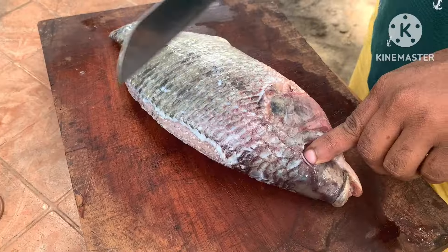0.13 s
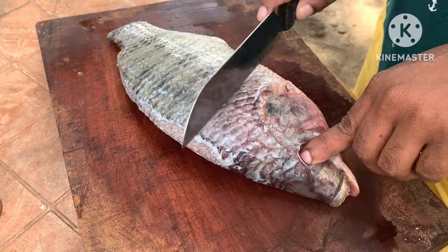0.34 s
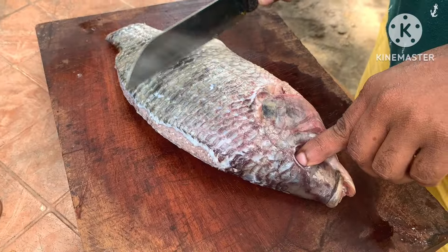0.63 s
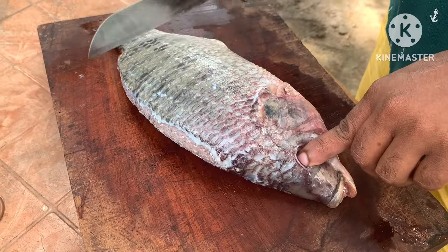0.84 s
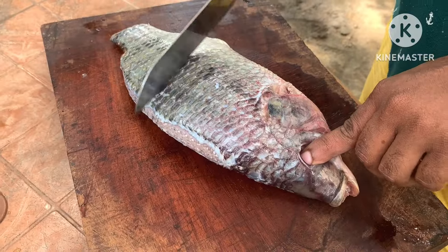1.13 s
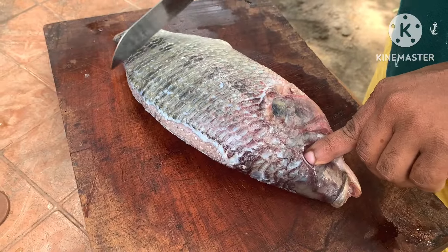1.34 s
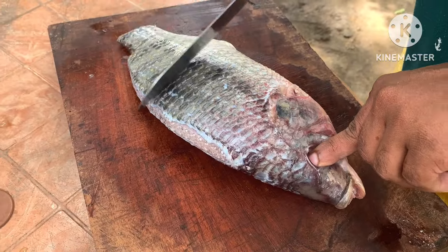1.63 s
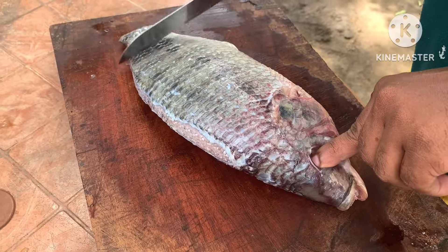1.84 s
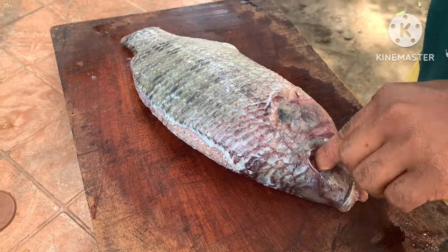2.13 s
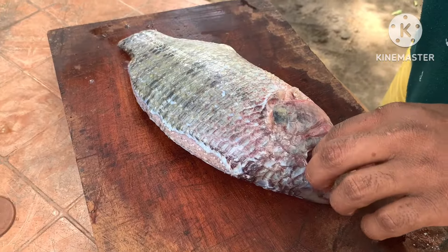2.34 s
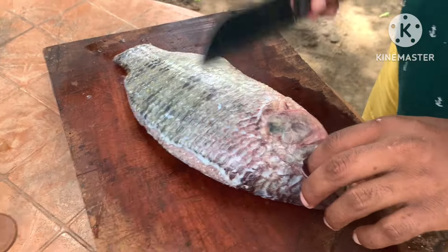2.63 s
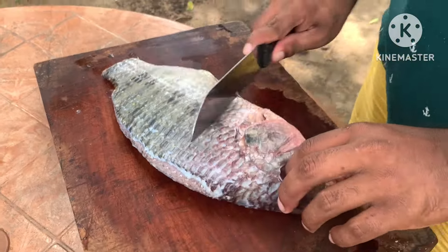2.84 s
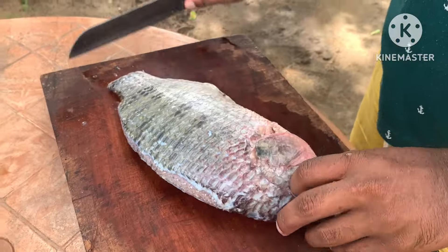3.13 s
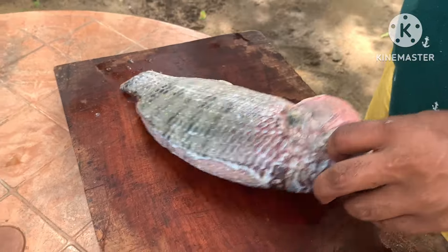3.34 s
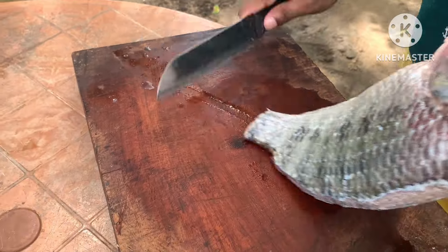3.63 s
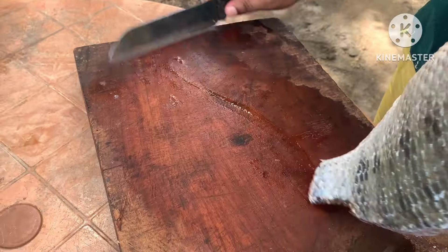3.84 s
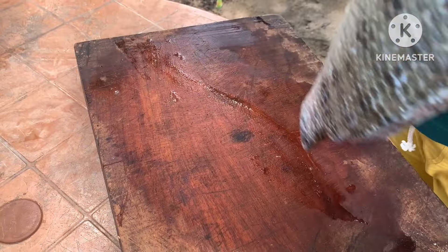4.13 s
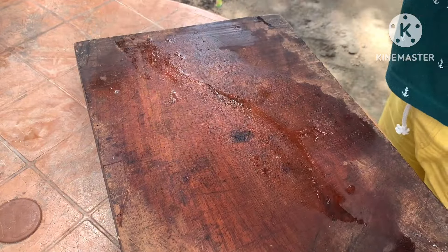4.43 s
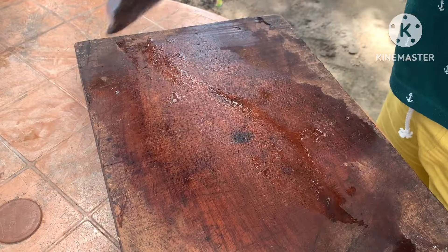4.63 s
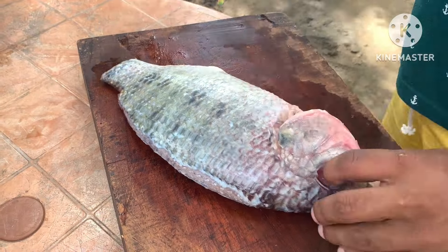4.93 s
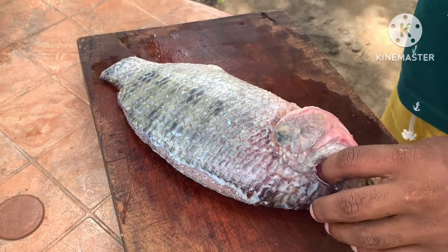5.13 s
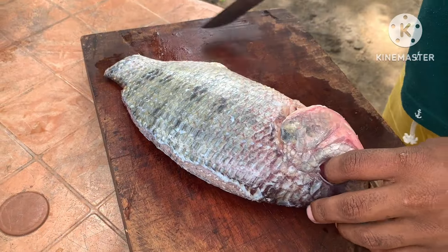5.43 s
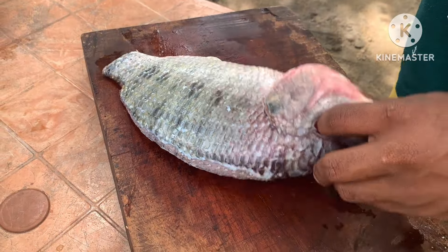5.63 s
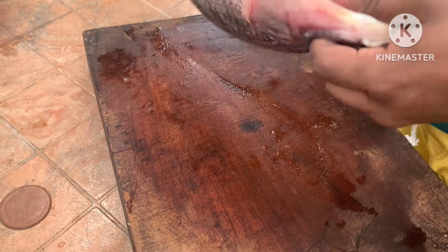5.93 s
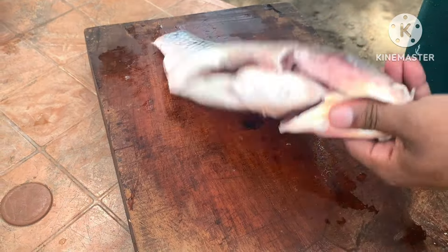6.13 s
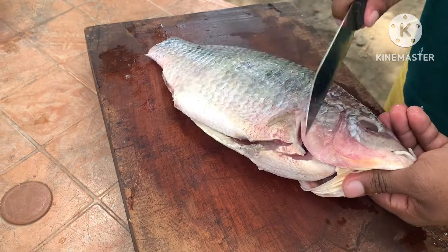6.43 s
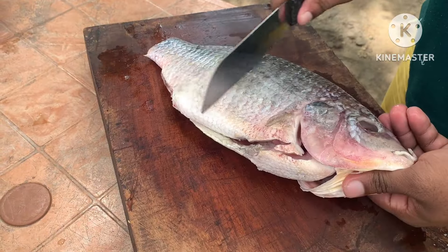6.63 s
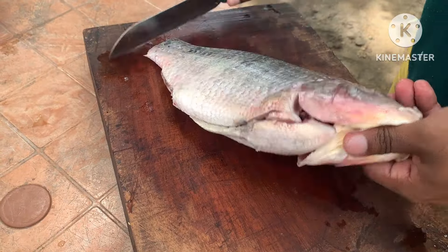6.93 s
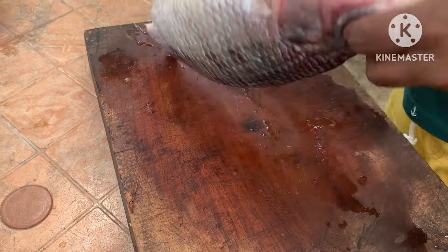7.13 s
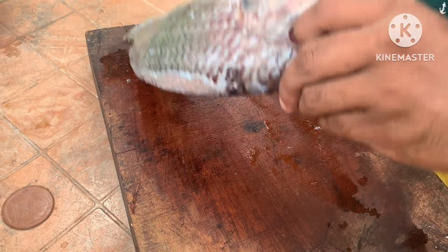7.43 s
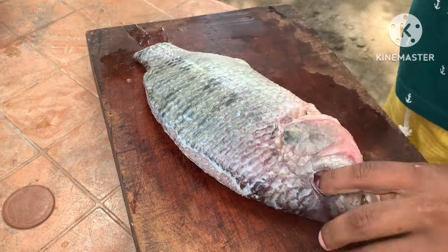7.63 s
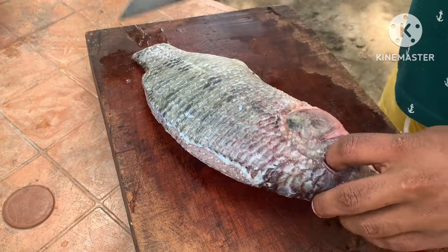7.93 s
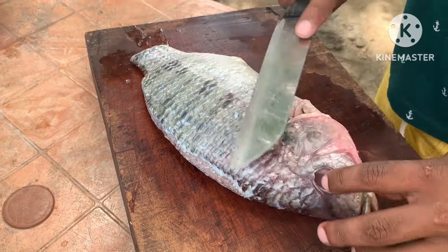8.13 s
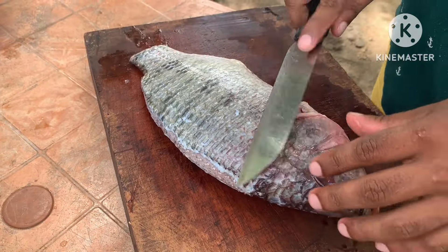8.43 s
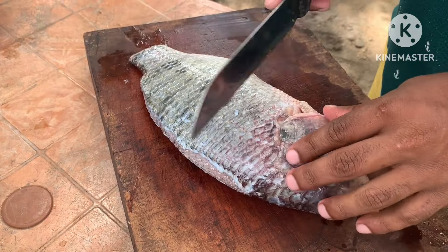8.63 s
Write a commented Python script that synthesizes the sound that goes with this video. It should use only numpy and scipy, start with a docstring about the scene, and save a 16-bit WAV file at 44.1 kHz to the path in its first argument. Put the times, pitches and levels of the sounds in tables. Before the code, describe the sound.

A knife works on a wet fish on a wooden cutting board, close and centred, outdoors over a faint low rumble and distant insect hiss. From the start, soft grainy scrapes slide across the scales. From 0.8 seconds a cricket-like insect on the right sings short, high, rising trills roughly once a second. At 2 seconds a quick cluster of knocks rattles the board and thumps the light table beneath. The hardest knock lands at 3.1 seconds with a brief rasp. More knocks and a bright blade scrape follow around 3.7 to 3.9. Scales and wet skin tick as the fish is lifted and turned. Another hard, sharp knock comes at 5.3 seconds, then scattered wet clicks and light scrapes. Further knocks fall at 6.5, at 6.9 with a dull thump, and more softly at 7.5 and 7.9, leaving faint ticks until nearly 9 seconds.

```python
"""Outdoors, over a low rumble, a far insect hiss and a faint hum, a knife slides over a wet fish and a
wooden board: grains under the edge hiss and rasp. From 0.8 s a cricket-like insect nearby sings rising
trills, one pulse per wing stroke. From 1.2 s scales and slime tick as the fish is lifted and turned.
Then blade and fish knock the board, and from 1.9 s the light table under it thumps. The sounds
interleave to the end; the hardest knocks come near 3.1 s and 5.3 s."""
import sys
import numpy as np
from scipy import signal
from scipy.fft import rfft, irfft, next_fast_len
from scipy.io import wavfile
from scipy.ndimage import uniform_filter1d

SR = 44100
rng = np.random.default_rng(int(sys.argv[2]) if len(sys.argv) > 2 else 0)


def store_wav(level_fs):
    """Save 16-bit WAV to argv[1]."""
    pcm = np.round(np.clip(np.atleast_2d(level_fs), -1, 1) * 32767)
    wavfile.write(sys.argv[1], SR, pcm.T.astype(np.int16))


N = 386757
N_FFT = next_fast_len(N)
BIN_HZ = np.fft.rfftfreq(N_FFT, 1 / SR)

# modes of the wooden board: f/Hz, level/dB, t60/s
BOARD_MODES = [(452.2, -4.5, 0.035), (647, -9, 0.075), (770, -2.5, 0.018), (888.5, -4, 0.014),
               (1140, -9.5, 0.056), (1254, -1.5, 0.043), (1361, 4, 0.03), (1656, 3.5, 0.022),
               (2054, -5, 0.043), (2266, 7.5, 0.025), (2986, 6.5, 0.014), (3217, 1.5, 0.014),
               (3940, -1.5, 0.0074), (4620, -7.5, 0.0061), (4990, -10.5, .02)]
# pushes on the table top: t/s, peak/dB, best excited f/Hz
TABLE_PUSHES = [(1.948, -18, 193), (2, -18, 206), (2.022, -23, 111.4), (2.709, -35.5, 86.1),
                (3.072, -20.5, 174), (3.101, -28.5, 76.8), (3.669, -32, 184), (4.702, -36.5, 112),
                (4.739, -37, 78.1), (5.339, -26, 277), (5.506, -35, 126), (6.112, -38.5, 116),
                (6.144, -32, 65.5), (6.938, -19, 116), (6.955, -21, 90), (7.471, -37, 80),
                (7.508, -30.5, 56), (7.548, -33.5, 96.9), (8.437, -43.5, 90.7)]


def from_db(db):
    return 10 ** (np.asarray(db) / 20)


def unit_rms(x):
    return x / np.sqrt(np.mean(x ** 2) + 1e-20)


def butter(order, hz, kind):
    return signal.butter(order, hz, kind, fs=SR, output="sos")


def add(out, at_s, piece):
    i = round(at_s * SR)
    out[i:i + len(piece)] += piece[:N - i]


def per_bin(curve):
    """Curve read at each FFT bin, on a log-frequency axis."""
    hz, value = np.transpose(curve)
    return np.interp(np.log(BIN_HZ + 1), np.log(hz + 1), value)


def drift(rate_hz):
    """Smooth random wander, rms about 1."""
    step_hz = 200
    steps = rng.standard_normal(int(N / SR * step_hz) + 2)
    r = np.exp(-2 * np.pi * rate_hz / step_hz)
    smooth = unit_rms(signal.lfilter([1], [1, -2 * r, r * r], steps))
    return np.interp(np.arange(N) / SR * step_hz, np.arange(len(steps)), smooth)


def ring(x, hz, t60_s):
    """One damped mode; a unit click rings at height 1."""
    r, w = from_db(-60 / (t60_s * SR)), 2 * np.pi * hz / SR
    return signal.lfilter([.5, 0, -.5], [1, -2 * r * np.cos(w), r * r], x) / np.sin(w)


def falloff_db(hz, best_hz, db_per_octave):
    """Modes far from the best excited pitch get less."""
    return -db_per_octave * np.abs(np.log2(hz / best_hz))


def strike(modes, weights_db, contact_s):
    """Weighted modes swell during contact, then decay; peak 1."""
    t = np.arange(SR // 3) / SR
    hz, db, t60_s = np.transpose(modes)[:, :, None]
    strength, phase = rng.standard_normal((2, len(modes), 1))
    decay = from_db(db + weights_db[:, None] + 1.5 * strength - 60 * t / t60_s)
    rings = decay * np.sin(2 * np.pi * hz * t + 2 * phase)
    out = rings.sum(0) * (1 - np.exp(-(t / contact_s) ** 2))
    return out / np.abs(out).max()


def stereo_noise(spectrum):
    """Shaped noise, its sides alike only in the bass; mid rms 1."""
    # left-right likeness: f/Hz, correlation
    likeness = [(60, .96), (300, .88), (640, .2), (3000, 0), (6800, -.2), (15000, -.3)]
    alike = per_bin(likeness)
    mid, side = rfft(rng.standard_normal((2, N_FFT))) * from_db(per_bin(spectrum))
    pair = irfft(np.sqrt(1 + alike) * mid + np.sqrt(1 - alike) * side * [[1], [-1]], N_FFT)[:, :N]
    return pair / np.sqrt(np.mean(pair.mean(0) ** 2))


def rumble():
    """Lumpy low noise; its upper part swells as the table rattles on after each thump."""
    # rumble envelope: t/s, level/dB
    envelope = [(0.0, -60.5), (0.36, -64), (0.56, -57), (0.95, -63.5), (1.17, -57), (1.59, -57),
                (2.42, -61.5), (2.95, -53), (3.5, -60), (3.88, -52), (4.47, -67.5), (5.18, -55.5),
                (5.91, -60), (6.5, -55.5), (7.21, -60.5), (7.7, -56.5), (8.16, -59), (8.33, -48.5),
                (8.5, -58), (8.77, -61.5)]
    # rumble spectrum: f/Hz, density/dB
    spectrum = [(13, -44.5), (22, -21), (59, 4), (91, 0), (169, -7.5), (262, -16), (316, -13.5),
                (392, -24.5), (700, -24), (910, -67), (1540, -120)]
    rattle_db, rattle_t60_s = -13, .18
    t, rattle = np.arange(N) / SR, np.zeros(N)
    for at_s, db, _ in TABLE_PUSHES:
        add(rattle, at_s, from_db(db + rattle_db - 60 * t[:SR] / rattle_t60_s))
    noise = from_db(4.2 * drift(36)) * stereo_noise(spectrum)
    upper = signal.sosfilt(butter(4, 70, "high"), noise)
    return from_db(np.interp(t, *np.transpose(envelope))) * noise + rattle * upper


def far_hiss():
    """Leaves and distant noise waver more than the far insects above them in pitch."""
    # faint background hiss, with a narrow gap near 11.5 kHz not from the scene: f/Hz, density/dB
    spectrum = [(240, -46.5), (400, -14), (755, -10.5), (1220, -6.5), (1420, -12.5), (1740, -9),
                (5560, -9.5), (7350, 2), (10500, -16.5), (11000, -17), (11500, -68), (12500, -11.5),
                (14100, -25.5), (15000, -13), (16200, -55)]
    noise = stereo_noise(spectrum)
    leaves = signal.sosfiltfilt(butter(2, 5500, "low"), noise)
    insects = noise - leaves
    return leaves * from_db(-63.5 + 2 * drift(1.1)) + insects * from_db(-65.5 + drift(1.9))


def hum():
    """Faint low tone that comes and goes."""
    return from_db(-79 + 4 * drift(5)) * unit_rms(ring(rng.standard_normal(N), hz=312, t60_s=.2))


def blade_hiss(grains):
    """Grains hiss under the edge and ring the blade."""
    # bright scraping hiss, with a gap near 11-12 kHz not from the knife: f/Hz, density/dB
    spectrum = [(900, -30), (1500, -12), (2500, -3.5), (4000, -7), (5600, -8), (7000, -1.5), (9000, -7),
                (10700, -3), (11300, -38), (12100, -35), (12600, -8.5), (14500, -8), (15700, -12.5),
                (16300, -49)]
    # blade modes: f/Hz, nominal width/Hz, level/dB
    modes = [(5260, 75, -16), (6700, 100, 0.5), (8780, 250, -4), (10060, 70, -1)]
    # how freely the blade rings: t/s, gain/dB
    freedom = [(0, -28), (2.9, -11.5), (3.8, -6.5), (4.2, -10), (6.4, -9.5), (6.5, -15.5), (6.9, 5),
               (7.05, -15.5), (8.77, -5)]
    hiss = unit_rms(irfft(rfft(grains, N_FFT) * from_db(per_bin(spectrum)), N_FFT)[:N])
    ringing = sum(from_db(db + 2 * drift(1.1)) * unit_rms(ring(grains, hz, 2.6 / width_hz))
                  for hz, width_hz, db in modes)
    return hiss + from_db(np.interp(np.arange(N) / SR, *np.transpose(freedom))) * ringing


def board_rasp(grains, grid_s, best_hz, gain):
    """Grains ring the rubbed board; the place of the edge favours modes near a pitch and 2.1 times it."""
    t, rasp = np.arange(N) / SR, np.zeros(N)
    t60_share = .9
    press_db = np.clip(20 * np.log10(gain) + 16, -30, 0)
    for hz, db, t60_s in BOARD_MODES:
        place_db = np.maximum(falloff_db(hz, best_hz, 30), falloff_db(hz, 2.1 * best_hz, 60) - 1.5)
        # a firm press also reaches the hollow low and hard high modes
        floor_db = press_db if 550 < hz < 900 or 2700 < hz < 3300 else -40
        weight = from_db(db + np.maximum(place_db, floor_db))
        rasp += np.interp(t, grid_s, weight) * ring(grains, hz, t60_share * t60_s)
    running_rms = np.sqrt(uniform_filter1d(rasp ** 2, SR // 8))
    return np.interp(t, grid_s, gain) * rasp / running_rms


def knife_strokes():
    """The sliding edge meets dense, uneven grains that drive blade and board."""
    # slides: firmest t/s, 20 dB rise/s, 20 dB fall/s, hiss/dB, rasp/dB, best excited f/Hz
    slides = [(0.02, 0.06, 0.053, -61, -68, 1390), (0.18, 0.048, 0.072, -63, -66.5, 1800),
              (0.5, 0.11, 0.26, -70, -66.5, 507), (0.67, 0.35, 0.22, -51.5, -61.5, 500),
              (1.1, 0.09, 0.58, -60.5, -63.5, 504), (1.63, 0.15, 0.3, -65, -82, 543),
              (1.809, 0.034, 0.12, -66, -52.5, 835), (1.932, 0.025, 0.033, -55.5, -58, 846),
              (1.998, 0.043, 0.11, -50.5, -53, 1330), (2.62, 0.061, 0.12, -60, -80, 760),
              (2.705, 0.015, 0.02, -51, -51, 870), (2.765, 0.02, 0.089, -49.5, -51.5, 810),
              (2.952, .09, 0.22, -48.5, -48, 500), (3.098, 0.028, 0.029, -29.5, -30, 1350),
              (3.145, .02, 0.047, -62, -59.5, 655), (3.314, .08, 0.11, -55, -70, 1660),
              (3.67, 0.12, 0.18, -54, -67, 1400), (3.775, 0.039, 0.081, -34.5, -29, 1280),
              (3.838, 0.046, 0.03, -18.5, -22, 1190), (3.921, .04, 0.19, -57, -71.5, 1325),
              (4.715, 0.0083, 0.018, -60, -48.5, 1050), (4.854, 0.17, 0.13, -55, -62.5, 1040),
              (5.361, .01, 0.015, -59, -33, 760), (5.391, .02, 0.073, -50.5, -56, 780),
              (5.52, 0.04, 0.038, -79.5, -63.5, 527), (5.686, 0.14, 0.23, -51, -75, 2390),
              (6.127, 0.034, 0.18, -52, -61.5, 1280), (6.36, 0.19, 0.14, -63.5, -78, 1400),
              (6.479, 0.016, 0.11, -49, -48.5, 680), (6.65, 0.17, .2, -53, -61.5, 730),
              (6.83, 0.0057, 0.0065, -33.5, -55, 1330), (6.88, 0.037, .06, -63, -63.5, 1400),
              (6.933, 0.015, 0.042, -45, -31, 1140), (7.014, .01, 0.084, -50, -79, 1110),
              (7.493, 0.066, .1, -56, -77, 1427), (7.531, 0.013, 0.077, -53, -47.5, 1480),
              (7.936, 0.11, 0.065, -60, -77, 1440), (8.03, 0.14, 0.21, -59, -80.5, 1500),
              (8.3, 0.075, 0.08, -75, -67, 497)]
    grains_per_s, size_spread_db = 6000, 3
    t, grid_s = np.arange(N) / SR, np.arange(0, N / SR, .001)
    at_s, rise_s, fall_s, hiss_db, rasp_db, hz = np.transpose(slides)[:, :, None]
    distance = np.abs(grid_s - at_s) / np.where(grid_s < at_s, rise_s, fall_s)
    fade_db = 20 * np.minimum(distance, 5) ** 1.34
    hiss_gain, rasp_gain = from_db(hiss_db - fade_db), from_db(rasp_db - fade_db) + 1e-9
    best_hz = hz[rasp_gain.argmax(0), 0]  # set by the strongest slide
    sizes = from_db(size_spread_db * np.minimum(rng.exponential(1, N), 4.5)) * rng.choice([-1, 1], N)
    hits = rng.random(N) < grains_per_s / SR
    grains = unit_rms(sizes * hits * from_db(2.2 * drift(70)))
    hiss = np.interp(t, grid_s, hiss_gain.sum(0)) * blade_hiss(grains)
    return hiss + board_rasp(grains, grid_s, best_hz, rasp_gain.sum(0))


def insect_trills():
    """Each wing stroke is a falling near-sine; a trill swells and climbs to its last pulse."""
    # trills: first pulse t/s, last pulse t/s, spacing/s, last pulse level/dB
    trills = [(0.8061, 0.9587, .0388, -45), (1.4152, 1.6282, .0366, -40), (2.9846, 3.1602, .036, -41.5),
              (3.852, 3.8896, .038, -43), (4.0033, 4.0033, .037, -58.5), (4.6269, 4.8125, .0383, -44.5),
              (5.5573, 5.7743, .0376, -40.5), (5.911, 5.911, .037, -57.5), (6.6682, 6.8982, .0365, -41),
              (7.7179, 7.9448, .0374, -41)]
    pulse_s, hz_per_db, third_partial_db = .015, 19.5, -25
    out, t = np.zeros(N), np.arange(int(pulse_s * SR)) / SR
    envelope = np.sin(np.pi * t / t[-1]) ** 1.38
    glide = 1.06 - 10.65 * t
    for first_s, last_s, spacing_s, top_db in trills:
        times_s = np.append(np.arange(first_s, last_s - spacing_s / 2, spacing_s), last_s)
        for before_last, at_s in enumerate(times_s[::-1]):
            db = top_db - .65 * before_last ** 2
            hz = (4971 + hz_per_db * (db + 44)) * glide  # softer pulses lie lower
            phase = 2 * np.pi * np.cumsum(hz) / SR
            tone = np.sin(phase) + from_db(third_partial_db) * np.sin(3 * phase)
            add(out, at_s - .005, from_db(db) * envelope * tone)
    return out


def scale_ticks():
    """Scales and wet skin snap free: a broad click and a brief ring, shorter at higher pitch."""
    # snaps: t/s, peak/dB, f/Hz
    snaps = [(1.2426, -40, 6500), (1.2605, -40, 6620), (2.7056, -26, 10200), (2.7065, -30, 14600),
             (2.727, -39, 9300), (2.7576, -30, 9600), (2.759, -24, 14500), (2.7693, -28, 10400),
             (3.097, -12, 9600), (3.245, -32, 2110), (3.305, -39.5, 1600), (3.3064, -32.5, 5100),
             (3.9605, -39.5, 2200), (4.085, -41, 2530), (4.1965, -44, 1700), (4.28, -45.5, 1280),
             (4.152, -46, 2730), (4.7694, -41, 10100), (4.784, -32, 9400), (4.878, -33.5, 8800),
             (4.881, -33, 3000), (5.4147, -43.5, 1124), (5.5341, -42, 8930), (5.567, -37, 3720),
             (5.6093, -38, 8700), (5.6507, -36, 8910), (5.654, -36, 2370), (5.67, -42, 2350),
             (5.6912, -27, 2270), (5.692, -30.5, 9500), (5.7362, -33.5, 9400), (5.7485, -38, 2290),
             (5.7892, -35.5, 9300), (5.7903, -40, 1650), (5.908, -47, 1790), (5.929, -42.5, 1770),
             (6.0068, -40, 3200), (6.024, -36, 6800), (6.0233, -40.5, 1730), (6.131, -25, 9050),
             (6.1404, -33, 8500), (6.164, -38, 2530), (6.2098, -40, 8850), (6.2277, -39, 8660),
             (6.2642, -42.5, 3900), (6.345, -44, 1580), (6.353, -33, 7550), (6.407, -49, 1590),
             (6.5038, -23.5, 6670), (6.5164, -21, 6600), (6.6046, -33.5, 10100), (6.712, -25.5, 9700),
             (6.799, -28, 10900), (6.83, -22, 14200), (6.926, -33, 13500), (7.015, -30, 9670),
             (7.1184, -44.5, 1220), (7.4714, -34, 7930), (7.487, -17.5, 9140), (7.4964, -25, 8850),
             (7.597, -40.5, 5500), (7.89, -36.5, 9520), (8.0008, -31.5, 9940), (8.2343, -40.5, 8870),
             (8.4947, -43.5, 2240), (8.6046, -46, 2290)]
    t60_cycles, click_gain = 11, .17
    out, t = np.zeros(N), np.arange(600) / SR
    for at_s, db, hz in snaps:
        decay_s = .0021 * np.sqrt(2000 / hz)
        burst = rng.standard_normal(len(t)) * np.exp(-t / decay_s)
        snap = ring(burst, hz, t60_cycles / hz) + click_gain * signal.lfilter([1, -.6], [1], burst)
        add(out, at_s, from_db(db) * snap / np.abs(snap).max())
    return out


def board_knocks():
    """A hard blow of blade or fish rings the board and throws off a bright crack."""
    # blows: t/s, peak/dB, best excited f/Hz, crack/dB re peak, low-mode floor/dB, high-mode floor/dB
    blows = [(1.354, -42, 802, -18, -7, -17), (1.946, -13, 1360, -7, -3.5, -25),
             (1.988, -19, 1340, -3.5, -4.5, -31), (1.997, -12.5, 1350, -2.5, -12, -39),
             (2.003, -12, 1340, -7, -24.5, -31), (2.013, -12.5, 1390, -11.5, -0.5, -21.5),
             (2.693, -29, 484, -19, -32, -35), (2.711, -24, 1084, -11, -8, -9.5),
             (3.071, -2, 1510, -8, -16.5, -5), (3.097, -16, 1050, -8, -14.5, -12.5),
             (3.678, -14.5, 1420, -21, -32.5, -13), (3.689, -32, 1320, -6, -4.5, -20),
             (3.838, -13, 1187, -16.5, -15, -6), (3.851, -14, 1278, -10, -13.5, -11.5),
             (4.709, -47, 1432, -16.5, 1.5, -25), (5.344, -9, 2040, -21, -65, 13),
             (5.346, -5, 3770, -10.5, -30, -10), (5.359, -36.5, 654, -1, -2, -16),
             (6.202, -41, 723, -9, -15, -32), (6.455, -18, 1680, -41, -3.5, -10.5),
             (6.492, -36.5, 1420, -9, -11, -25), (6.601, -44, 664, -10, -16, -24),
             (6.65, -40.5, 700, -9, -17, -33), (6.926, -14.5, 1560, -4, -11, -10),
             (6.954, -24.5, 1370, -21, 9, -33.5), (7.529, -23.5, 2060, -21, -10, -4),
             (7.534, -24, 1430, -3, -13.5, -20.5), (7.94, -28, 1574, 0.5, -13, -34.5)]
    contact_s = .00061
    out, t = np.zeros(N), np.arange(SR // 50) / SR
    crack_band = butter(2, [2400, 11000], "band")
    mode_hz = np.array(BOARD_MODES)[:, 0]
    hollow, hard = (mode_hz > 400) & (mode_hz < 900), mode_hz > 2500
    for at_s, db, best_hz, crack_db, low_db, high_db in blows:
        crack = signal.sosfilt(crack_band, rng.standard_normal(len(t)) * t * np.exp(-t / contact_s))
        floor_db = np.select([hollow, hard], [low_db, high_db], -25)
        weights_db = np.maximum(falloff_db(mode_hz, best_hz, 43), floor_db)
        add(out, at_s - .0005, from_db(db) * strike(BOARD_MODES, weights_db, contact_s))
        add(out, at_s - .0005, from_db(db + crack_db) * crack / np.abs(crack).max())
    return out


def table_thumps():
    """A soft push sets the table top booming."""
    # table top modes: f/Hz, level/dB, t60/s
    modes = [(56, -5, 0.25), (88, -2, 0.25), (112, -13, .2), (151.8, -3.5, 0.14), (196.3, -6.5, 0.24),
             (223.1, -8, 0.19), (280.3, -2.5, .08), (371.5, -6, 0.11)]
    out, mode_hz = np.zeros(N), np.array(modes)[:, 0]
    for at_s, db, best_hz in TABLE_PUSHES:
        add(out, at_s, from_db(db) * strike(modes, falloff_db(mode_hz, best_hz, 12), contact_s=.005))
    return out


def direct(x, gain_db, left_over_right_db):
    """Two microphone ports hear a near source with a level gap and a pitch-dependent phase gap."""
    # phase between the ports: f/Hz, left lead/rad
    lead = [(0, 0), (500, -.9), (1400, .9), (2100, 2.0), (3000, 2.3), (4400, .2), (16400, -15.9)]
    left = np.exp(.5j * np.interp(BIN_HZ, *np.transpose(lead))) * from_db(left_over_right_db / 2)
    return from_db(gain_db) * irfft(rfft(x, N_FFT) * [left, 1 / left], N_FFT)[:, :N]


def echoes(x, t60_s, gain_db):
    """Ground, leaves and bodies return a short echo cloud, one per side."""
    t = np.arange(int(.3 * SR)) / SR
    cloud = rng.standard_normal((2, len(t))) * from_db(-60 * t / t60_s) * (t > .001)
    cloud = signal.sosfilt(butter(2, 500, "high"), cloud)
    cloud /= np.sqrt(np.sum(cloud ** 2, axis=1, keepdims=True))
    return from_db(gain_db) * signal.fftconvolve(x[None], cloud, axes=1)[:, :N]


def scene():
    """Knife work in the centre, insect to the right, background all round."""
    work = board_knocks() + scale_ticks() + knife_strokes() + table_thumps()
    song, air = insect_trills(), far_hiss()
    work = direct(work, gain_db=-1.5, left_over_right_db=-.31) + echoes(work, t60_s=.053, gain_db=-7)
    song = direct(song, gain_db=2, left_over_right_db=-9) + echoes(song, t60_s=.18, gain_db=.62)
    return work + song + rumble() + air + hum()


def record(dry):
    """Microphone: bass roll-off, rounded peaks, steep top cut."""
    bass_hz, ceiling, stop_hz = 40, .95, 16800
    dry = signal.sosfilt(butter(2, bass_hz, "high"), dry)
    rounded = ceiling * np.tanh(dry / ceiling)
    return signal.sosfilt(signal.cheby2(12, 60, stop_hz, fs=SR, output="sos"), rounded)


dry = scene()
out = record(dry)
store_wav(out)
```